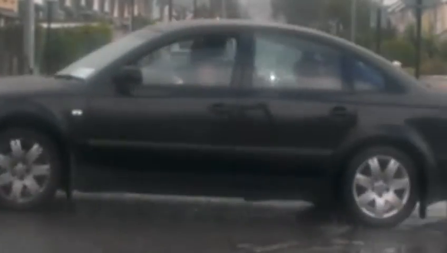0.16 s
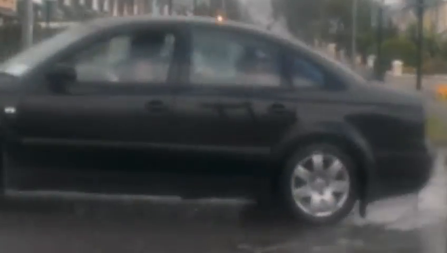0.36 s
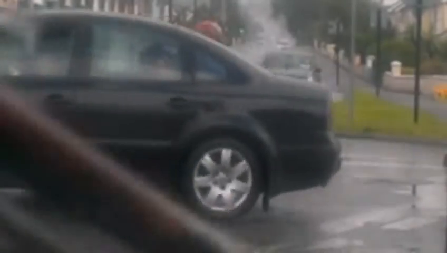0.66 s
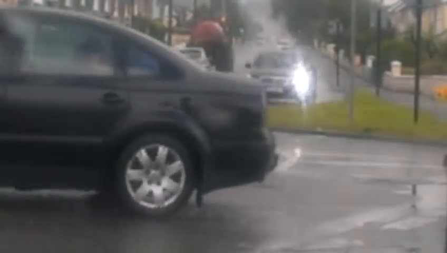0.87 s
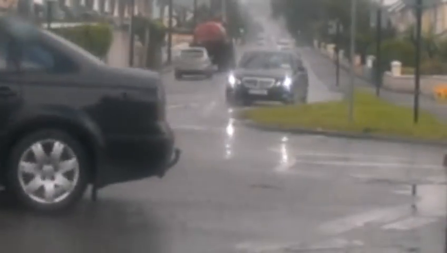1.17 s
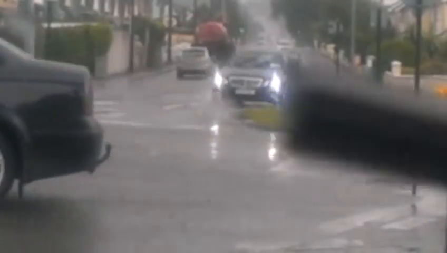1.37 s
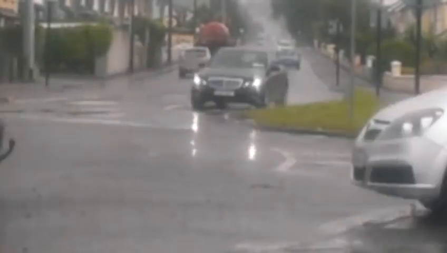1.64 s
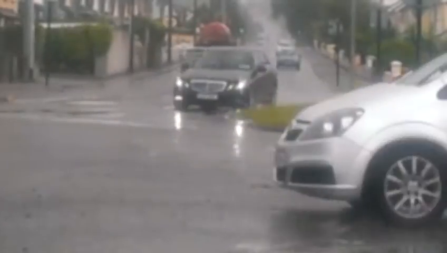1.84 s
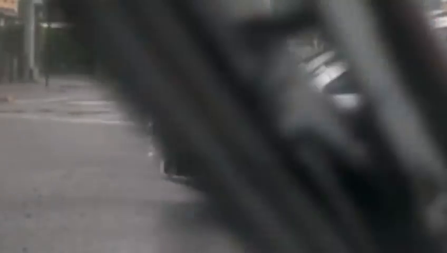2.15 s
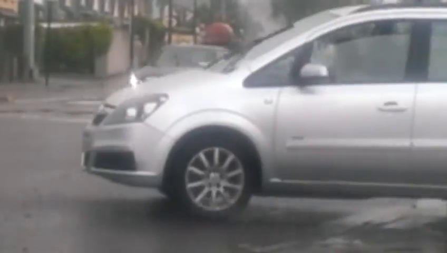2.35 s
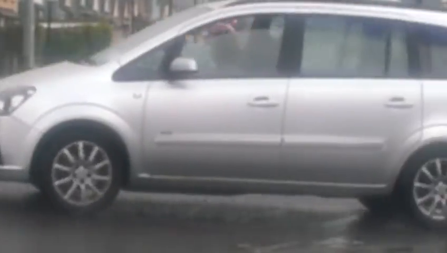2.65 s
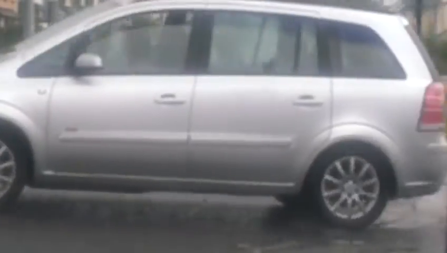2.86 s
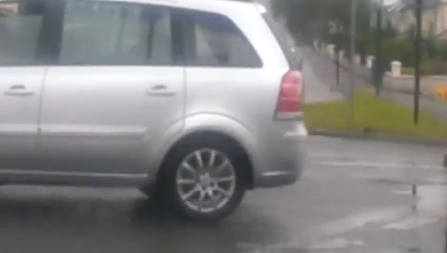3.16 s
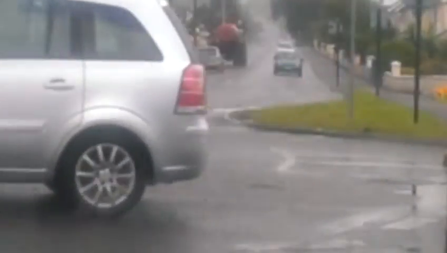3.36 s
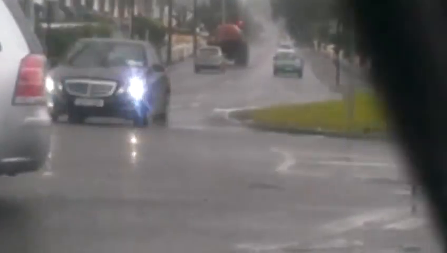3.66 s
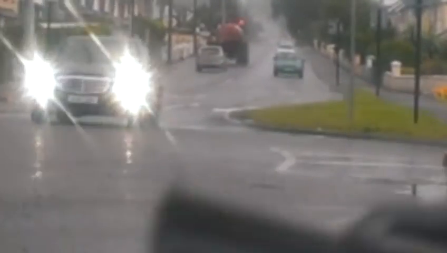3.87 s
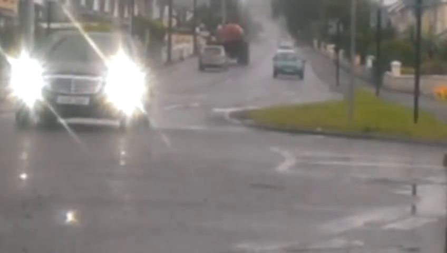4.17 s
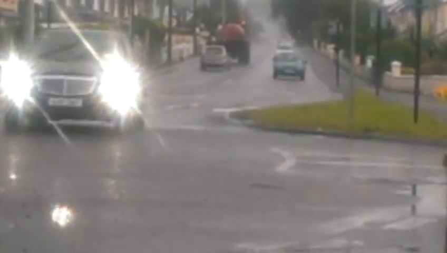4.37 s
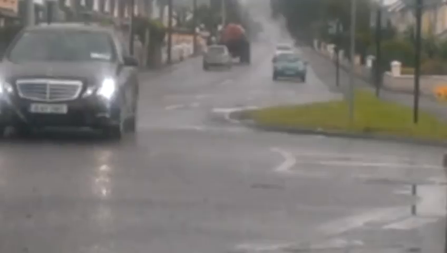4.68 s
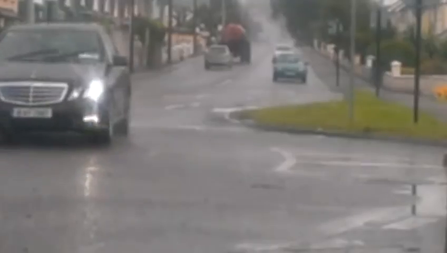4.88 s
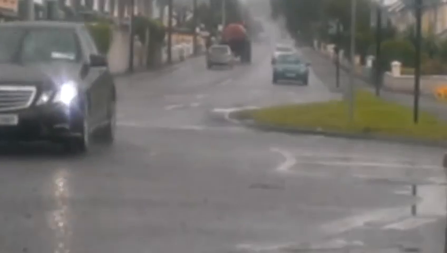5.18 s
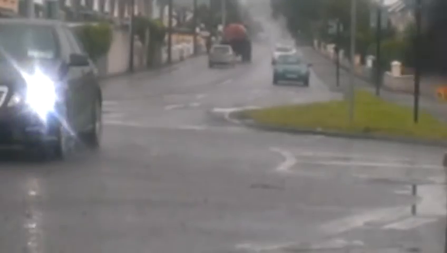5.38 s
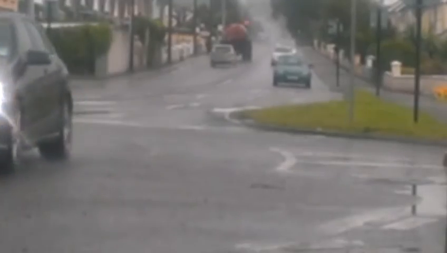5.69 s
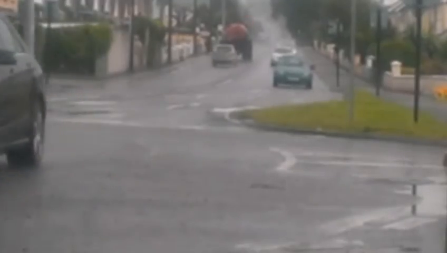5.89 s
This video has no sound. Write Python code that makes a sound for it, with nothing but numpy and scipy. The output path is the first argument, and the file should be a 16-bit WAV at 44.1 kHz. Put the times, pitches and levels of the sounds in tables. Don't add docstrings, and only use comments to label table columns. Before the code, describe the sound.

A quiet, close car interior in rain, with a light hiss of wet tyres outside, strongest at first and fading gradually. From 0 s a soft wiper motor whine climbs in pitch while rubber rubs and faintly groans on wet glass. At 0.5 s a hard, bright snap close to the microphone, with tiny rattling bounces, coincides with the blades knocking over at the top. They descend and flip at about 1.3 s in a cluster of dull, hollow flaps, ringing knocks and a linkage tick. The pattern repeats: upper turns near 2.1, 3.6 and 5.2 s, with glass thumps and a low body shudder; lower turns near 2.9, 4.4 and 5.9 s, with two overlapping groups of flaps. Each turn lasts around a tenth or two of a second, followed by small settling knocks. Occasional faint drops tick overhead. It ends as another upward stroke begins just after 6 s.

```python
import sys
import numpy as np
from scipy import signal
from scipy.fft import rfft, irfft, next_fast_len
from scipy.io import wavfile
from scipy.ndimage import map_coordinates

SR = 44100
rng = np.random.default_rng(int(sys.argv[2]) if len(sys.argv) > 2 else 0)


def to_wav(sig):
    pcm = np.clip(np.atleast_2d(sig), -1, 1) * 32767
    pcm = np.round(pcm).astype(np.int16)
    wavfile.write(sys.argv[1], SR, pcm.T)


def magnitude_from_level(level_db):
    exponent = np.asarray(level_db, float) / 20
    return 10 ** exponent


N = 265904

# time_s, level_db
ROAD_LEVEL = [
    (0.0, -63.5),
    (0.37, -64),
    (0.9, -67.5),
    (1.26, -65),
    (1.6, -67.5),
    (2.5, -69),
    (3.21, -71),
    (3.81, -69.5),
    (4.82, -72.5),
    (6.03, -71.5),
]
# frequency_hz, level_db_per_hz
TYRE_SPECTRUM = [(650, -36), (1100, 1.5), (1850, -4), (2720, 1), (3600, -6.5), (5000, -18), (6500, -20),
                 (11000, -120)]
# frequency_hz, level_db_per_hz
RUMBLE_SPECTRUM = [(12, -58), (20, -4.5), (60, -13.5), (113, -3.5), (128, -24), (140, 3), (180, -50),
                   (310, -120)]
# start_s, peak_db
ROOF_DROPS = [
    (0.123, -54),
    (1.4046, -54),
    (2.6787, -56),
    (2.857, -52.5),
    (3.6368, -53),
    (3.961, -56),
    (5.243, -53.5),
]
# start_s, length_s, squeak_db, spray_db
WATER_SHEETS = [(0.13, 0.02, -74, -72), (0.615, 0.23, -77, -73.5), (1.1, 0.25, -84, -75),
                (1.405, 0.026, -78, -72), (1.598, 0.17, -83, -76), (2.678, 0.053, -79, -74.5),
                (2.761, 0.18, -81, -74.5), (3.0, 0.22, -76.5, -76), (3.528, .06, -87, -81),
                (3.957, 0.039, -87, -70.5), (5.24, 0.012, -82, -66.5), (5.703, 0.13, -76.5, -74)]
# frequency_hz, level_db_per_hz
PREAMP_SPECTRUM = [(2060, -46), (3500, -9.5), (4790, -7.5), (8240, -6.5), (8880, -6), (12600, -6),
                   (15800, -0.5)]
# frequency_hz, level_db
PILOT_TONE = [(15488, -83)]
# time_s, pitch_hz, level_db
GEAR_WHINE = [
    [(0, 440, -60), (.138, 447, -69), (.25, 466, -57.5), (.356, 490.4, -51), (.46, 499.5, -52)],
    [(.64, 451, -61), (.74, 454, -60.5), (.988, 469, -63.5), (1.086, 487, -52), (1.2, 502, -53.5)],
    [(1.43, 437, -61), (1.6, 435.6, -67.5), (1.72, 454, -62.5), (1.83, 470, -57), (1.938, 490, -53),
     (2.0, 495, -52)],
    [(2.16, 456.5, -56), (2.25, 454.6, -62), (2.562, 473, -58), (2.63, 475.5, -51.5), (2.702, 497, -49),
     (2.74, 496, -47.5)],
    [(2.96, 434, -63), (3.16, 438.3, -68), (3.26, 453, -63.5), (3.444, 489, -53.5), (3.54, 496, -48)],
    [(3.72, 458.3, -57), (3.89, 459, -61), (4.088, 472.4, -60), (4.21, 487, -51), (4.28, 495, -51)],
    [(4.49, 432, -69), (4.7, 435, -80), (4.804, 455, -61.5), (4.98, 491, -51), (5.07, 495, -48)],
    [(5.24, 458, -54), (5.4, 456, -63), (5.634, 478.6, -61.5), (5.71, 486, -49), (5.786, 498.5, -50.5),
     (5.83, 497, -54)],
    [(6.0, 430, -63)],
]
# start_s, end_s, friction_db
STROKES = [
    (0.05, 0.459, -57.5),
    (0.626, 1.245, -59),
    (1.499, 2.019, -57.5),
    (2.199, 2.791, -59),
    (3.045, 3.551, -60),
    (3.752, 4.312, -59),
    (4.605, 5.08, -62.5),
    (5.298, 5.855, -60),
    (6.02, 6.5, -51),
]
# time_s, body_shake_db, drag_db, frame_buzz_db, lip_song_afterwards_db
REVERSALS = [
    (-0.2, -78, -55, -55, -58),
    (0.531, -55.5, -42.5, -48.5, -68),
    (1.33, -76, -45.5, -45.5, -70),
    (2.069, -57.5, -42.5, -53.5, -69),
    (2.86, -65, -52.5, -46, -63.5),
    (3.632, -57.5, -42.5, -49, -87),
    (4.4, -61.5, -52, -46.5, -66),
    (5.181, -52.5, -43.5, -52, -81),
    (5.94, -58, -46, -46.5, -60),
]
# start_s, length_s, level_db, pitch_hz
GLASS_GROANS = [
    (0.022, 0.26, -58.5, 332.3),
    (0.831, 0.087, -56, 191.6),
    (1.494, 0.21, -56, 334.3),
    (2.313, 0.11, -62.5, 229.5),
    (3.06, 0.091, -61.5, 336.5),
    (3.838, 0.11, -64.5, 218.6),
    (5.215, 0.028, -37, 199.7),
    (5.419, 0.076, -55.5, 211.5),
]
# frequency_hz, width_hz, level_db
GLASS_MODES = [(144.2, 12.6, -4), (195, 41.6, -3), (238.6, 52.3, -4), (324, 87.3, -6), (419, 138, -10)]
# frequency_hz, width_hz, level_db
FRAME_MODES = [(516, 81, 2.5), (672, 6.6, 7.5), (746, 46, 1), (865, 29, -14.5), (885, 23, -14),
               (1003, 43, -5.5)]
# frequency_hz, width_hz, level_db
STRUCK_MODES = [(650, 110, -2.5), (953, 116, 5), (1133, 420, -2), (1570, 860, -12.5)]
# frequency_hz, level_db_per_hz
SCRUB_SPECTRUM = [(600, 18.5), (1200, -6), (2500, -8.5), (5000, -25.5), (9000, -21), (16000, -33)]
# start_s, peak_db, pitch_hz
ARM_SETTLING = [(0.626, -49, 930), (0.649, -49, 696), (0.69, -47.5, 790), (0.719, -47, 757),
                (1.216, -45, 570), (2.017, -39, 670), (2.174, -43, 560), (2.194, -50, 779),
                (2.232, -45, 950), (2.27, -50, 710), (2.701, -45, 520), (3.777, -44.5, 964),
                (3.799, -54, 954), (4.186, -50, 420), (4.29, -45, 560), (4.627, -48, 395),
                (5.315, -52, 990), (5.62, -55, 985), (5.658, -48, 570)]
# start_s, snap_db, case_ring_db
NEAR_CLICKS = [
    (0.5043, -24, -25.5),
    (0.512, -31.5, -33),
    (0.52, -55, -47),
    (0.5265, -56, -43),
    (0.5323, -58, -56),
    (0.5448, -56, -50),
    (0.5396, -44, -34.5),
    (0.551, -52, -50),
]
# start_s,
# peak_db, pitch_hz
FRAME_KNOCKS = [(0.4825, -41, 870), (0.4912, -36, 800), (0.5019, -44, 844), (0.5087, -37, 886),
                (0.52, -37.5, 857), (0.5279, -34, 870), (1.2197, -47, 955), (1.2458, -40, 960),
                (1.2582, -39.5, 953), (1.2662, -39, 946), (1.2756, -45, 865), (1.3245, -42, 794),
                (1.3353, -39, 830), (1.3433, -45, 890), (1.3514, -33, 970), (2.0269, -44, 724),
                (2.0348, -43, 838), (2.045, -32.5, 890), (2.0583, -44, 816), (2.0696, -42.5, 950),
                (2.0763, -44, 820), (2.7809, -37.5, 950), (2.7909, -42, 965), (2.805, -34, 893),
                (2.8143, -41, 830), (2.8244, -38, 844), (2.8354, -40, 790), (2.8606, -39, 864),
                (2.8731, -34, 1085), (2.8867, -35.5, 910), (2.9055, -41, 900), (3.5626, -41, 810),
                (3.5802, -33, 920), (3.588, -33, 935), (3.6016, -37, 950), (3.615, -42, 955),
                (3.632, -47, 946), (3.6394, -45, 915), (4.293, -43.5, 950), (4.3145, -39, 936),
                (4.3312, -38.5, 880), (4.3478, -56, 849), (4.4053, -42, 950), (4.4145, -45, 860),
                (4.4275, -37, 960), (4.4438, -45, 844), (5.1043, -42, 840), (5.1222, -32, 905),
                (5.1436, -36, 952), (5.1579, -41, 840), (5.171, -39, 880), (5.18, -44, 940),
                (5.19, -46, 826), (5.8596, -43, 960), (5.8762, -45, 925), (5.893, -38, 865),
                (5.9372, -37, 980), (5.9449, -50, 850), (5.965, -42, 922),
                (2.02, -57, 1550), (2.044, -59, 1600), (2.06, -51, 1340), (2.068, -52, 1260),
               (2.094, -55, 1550), (3.582, -50, 1390), (3.593, -53, 1810), (3.648, -49, 1260),
               (5.122, -51, 1422), (5.186, -46, 1290), (5.937, -40, 1370), (5.949, -47, 1320)]
# start_s, peak_db
ARM_PINGS = [(0.4868, -35), (0.5282, -32.5), (0.5537, -42.5), (1.2573, -19.5), (1.2795, -24), (1.3226, -27),
             (1.3514, -24.5), (2.0422, -28.5), (2.051, -29), (2.082, -46), (2.7542, -34), (2.7815, -29.5),
             (2.8025, -20), (2.8149, -33), (2.8264, -32), (2.8651, -22.5), (2.883, -33), (3.5529, -50),
             (3.5651, -37), (3.5817, -27.5), (3.5917, -48), (3.6309, -30), (3.6455, -33.5), (4.2872, -36),
             (4.2993, -33), (4.3134, -24.5), (4.3256, -21.5), (4.3382, -34), (4.3504, -27), (4.3956, -25),
             (4.4107, -41), (4.4217, -30.5), (4.4351, -40), (5.0859, -38), (5.1044, -30.5), (5.1183, -33),
             (5.1353, -35), (5.1718, -29), (5.8712, -22), (5.8941, -28), (5.9171, -32), (5.9388, -30),
             (5.9646, -25.5)]
# start_s, peak_db, upper_ring_db, crack_db
LINKAGE_TICKS = [(1.3245, -49, 0, -25), (1.3393, -36.5, -7, -3), (2.059, -57, 0, -17),
                 (2.8523, -51, -3, -28), (2.867, -41.5, -9, 3), (2.8769, -36, -13, -12),
                 (3.6367, -36.5, 3, -15), (4.398, -44, -25, -33), (4.409, -34.5, -9, 3),
                 (5.1764, -37, 0, -30), (5.9402, -39, -1, 8)]
# frequency_hz, width_hz, level_db
LINKAGE_MODES = [(1150, 270, 5), (1654, 71, 5.5), (1850, 200, 2)]
# frequency_hz, width_hz, level_db
LINKAGE_UPPER_MODES = [(2330, 140, -4.5), (2690, 280, -0.5), (2870, 1100, -28)]
# start_s, lip_db, lip_hz, length_s
LEADING_FLAPS = [(1.215, -31.5, 348, 0.02), (1.2455, -17.5, 371, 0.011), (1.258, -16, 366, 0.018),
                 (1.276, -28.5, 450, 0.016), (1.297, -28, 420, 0.0082), (2.754, -29, 370, 0.017),
                 (2.7633, -33, 377, 0.015), (2.7826, -15, 353.5, 0.016), (2.804, -15.5, 391, 0.016),
                 (2.821, -29.5, 499, 0.016), (2.838, -40, 480, 0.016), (4.2904, -29, 400, 0.02),
                 (4.3137, -19, 356, 0.021), (4.3287, -17, 400, 0.015), (4.346, -26, 506, 0.013),
                 (5.82, -37, 436, 0.014), (5.838, -31, 327.5, 0.0082), (5.86, -18, 362, 0.012),
                 (5.8733, -16, 366, 0.017), (5.897, -18, 450, 0.0065), (5.908, -33, 415, 0.011)]
# start_s, lip_db, lip_hz, length_s, glass_thump_db
TRAILING_FLAPS = [(1.315, -35, 417, 0.023, -52), (1.329, -20.5, 341, 0.018, -43),
                  (1.348, -21.5, 378, 0.017, -26), (1.3624, -23.5, 320, 0.019, -28),
                  (2.848, -39, 400, 0.017, -33.5), (2.863, -15, 378, 0.0052, -44),
                  (2.874, -14, 438, 0.0051, -41), (2.887, -17, 338, 0.018, -51),
                  (2.904, -28, 360, 0.015, -33.5), (4.39, -31, 406, 0.0087, -27),
                  (4.4, -21, 332, 0.016, -22.5), (4.424, -21, 368, 0.0189, -24),
                  (4.442, -35, 380, 0.016, -29), (5.924, -21, 399, 0.015, -40),
                  (5.9385, -15, 307, 0.0095, -47), (5.952, -29.5, 373, 0.01, -32),
                  (5.9649, -19.5, 357, 0.018, -27), (5.984, -29.5, 363, 0.014, -32)]
# start_s, lip_db, glass_thump_db, length_s
TOP_FLAPS = [(0.4772, -44, -29.5, 0.081), (0.499, -35, -22, 0.009), (0.5163, -27.5, -46, 0.01),
             (0.528, -27.5, -48, 0.016), (0.5484, -39, -27, 0.0079), (0.554, -32.5, -50, 0.018),
             (2.02, -44, -30, 0.019), (2.03, -29, -29, 0.026), (2.05, -36.5, -55, 0.031),
             (2.0756, -28, -26, 0.0067), (2.087, -29, -47, 0.016), (2.108, -44, -26.5, 0.011),
             (2.171, -43, -38.5, 0.019), (3.552, -31.5, -36, 0.019), (3.569, -34, -29, 0.0083),
             (3.5818, -28, -17.5, 0.011), (3.6008, -25.5, -31, 0.024), (3.62, -47, -51, 0.0078),
             (3.638, -18.5, -52, 0.0071), (3.6442, -14.5, -40, 0.0033), (3.65, -29, -18.5, 0.012),
             (3.662, -40, -23.5, 0.021), (3.689, -39, -30, 0.012), (5.088, -37.5, -32.5, 0.016),
             (5.1067, -29.5, -61, 0.011), (5.1195, -32, -19.5, 0.023), (5.142, -29, -33, 0.0066),
             (5.153, -25.5, -27, 0.014), (5.176, -19, -45, 0.0047), (5.1825, -25, -19.5, 0.016),
             (5.203, -33, -22.5, 0.016)]
TOP_FLAP_PITCHES = [403, 373, 383, 371, 420, 381, 410, 380.7, 465, 419, 351, 420, 383, 458, 412, 431, 323,
                    367, 412, 397, 419, 409, 422, 403, 391.5, 444, 393, 338, 400, 344, 379]

ARM_HZ, ARM_UPPER_HZ = 553.7, 672
TURN_S = np.transpose(REVERSALS)[0]


def unit(x):
    return x / np.sqrt(np.mean(x ** 2) + 1e-20)


def curves(rows):
    s, *columns = np.transpose(rows)
    return [np.interp(np.arange(N) / SR, s, column) for column in columns]


def wobble(rate):
    knots = rng.standard_normal(int(N * rate / SR) + 4)
    return map_coordinates(knots, [np.arange(N) * rate / SR])


def swells(s, peak_db, rest_db, rise, fall, hold=0):
    t = np.arange(0, N / SR + .002, .002)
    late = t - s[:, None]
    before = np.clip(late, None, 0)
    after = np.clip(late - np.reshape(hold, (-1, 1)), 0, None)
    shape = np.exp(-(before / rise) ** 2 - after / fall)
    strongest = shape == shape.max(axis=0)
    level_db = rest_db + np.sum((peak_db - rest_db)[:, None] * shape * strongest, axis=0)
    return curves(np.transpose([t, level_db]))[0]


def filtered(x, response):
    m = next_fast_len(N + SR // 2)
    return irfft(rfft(x, m) * response(np.fft.rfftfreq(m, 1 / SR)), m)[:N]


def modes(table):
    def response(f):
        total = 0
        for k, (centre, width, db) in enumerate(table):
            damping = 1j * f * width
            total = total + (-1) ** k * magnitude_from_level(db) * damping / (centre * centre - f * f + damping)
        return total
    return response


def slope(points):
    f, db = np.transpose(points)
    return lambda hz: magnitude_from_level(np.interp(np.log(hz + 1), np.log(f + 1), db, left=-120, right=-120))


def noise(response):
    return unit(filtered(rng.standard_normal(N), response))


def impulses(times, db):
    strength = magnitude_from_level(db) * rng.choice([-1, 1], len(times))
    return np.bincount(np.round(times * SR).astype(int), strength, N)


def traffic():
    level_db = curves(ROAD_LEVEL)[0] - 1.5 + 0.18 * wobble(7.2)
    return magnitude_from_level(level_db) * noise(slope(TYRE_SPECTRUM))


def body_rumble():
    shake_db = np.transpose(REVERSALS)[1]
    level_db = swells(TURN_S - .03, shake_db, -86.0, rise=0.05, fall=0.21, hold=0.028)
    return magnitude_from_level(level_db + 7.0 + 0.37 * wobble(24.0)) * noise(slope(RUMBLE_SPECTRUM))


def water():
    s, length, squeak_db, spray_db = np.transpose(WATER_SHEETS)
    film_db = swells(s, squeak_db, -84.5, rise=.03, fall=0.12, hold=length) + 2.0 * wobble(53)
    film = magnitude_from_level(film_db) * noise(modes([(8970, 480, 1)]))
    thrown_db, thrown_s = np.resize([(-68.5, 0.076), (-68, 0.075)], (len(REVERSALS), 2)).T
    thrown_start = TURN_S - thrown_s / 2 + 0.017
    thrown_db = swells(thrown_start, thrown_db, -94, rise=0.018, fall=0.023, hold=thrown_s)
    pushed_db = swells(s, spray_db, -85.5, rise=0.0097, fall=0.045, hold=length)
    splash = modes([(11000, 12000, 0)])
    return film + magnitude_from_level(np.maximum(thrown_db, pushed_db)) * noise(lambda f: splash(f) ** 2)


def drops():
    s, db = np.transpose(ROOF_DROPS)
    return filtered(impulses(s, db + 21.0), modes([(9000, 820, 6.5), (13150, 5000, -6)]))


def motor():
    hz, db = curves(np.concatenate(GEAR_WHINE))
    db = db + swells(TURN_S, np.full(len(TURN_S), -1.5), 0, rise=0.035, fall=0.15, hold=0.07)
    phase = 2 * np.pi * np.cumsum(hz + 2.2 * wobble(30)) / SR
    arm_mode, grit_mode = modes([(ARM_HZ, 40, 0)]), modes([(480, 90, 0)])
    arm = magnitude_from_level(db - 11 + 3 * wobble(12)) * noise(lambda f: arm_mode(f) ** 2)
    grit = magnitude_from_level(db - 20) * noise(lambda f: grit_mode(f) ** 2)
    gear = np.sqrt(2) * np.sin(phase) * magnitude_from_level(db + 2 * wobble(60) + 2 * wobble(20))
    return arm + grit + gear


def rubbing():
    start, end, friction_db = np.transpose(STROKES)
    _, _, drag_db, buzz_db, song_db = np.transpose(REVERSALS)
    stroke_db, = curves(np.transpose([(start + end) / 2, friction_db]))
    drag_db = np.maximum(stroke_db, swells(TURN_S, drag_db, -61.5, rise=0.093, fall=0.16))
    buzz_db = np.maximum(stroke_db - 0.9, swells(TURN_S - 0.013, buzz_db, -69, rise=0.14, fall=0.17))
    song_db = swells(TURN_S + 0.096, song_db, -82.5, rise=0.29, fall=0.3, hold=0.091)
    unsteady = magnitude_from_level(1.1 * wobble(45))
    glass, frame_ring, broad = modes(GLASS_MODES), modes(FRAME_MODES), modes([(780, 700, 0)])
    lip = modes([(338, 16, 0), (372, 18, -5)])
    rubbed_glass = noise(lambda f: glass(f) * (1j * f / (1j * f + 100)) ** 2)
    drag = magnitude_from_level(drag_db + 1.0) * unit(unsteady * magnitude_from_level(1.0 * wobble(16.0)) * rubbed_glass)
    rubbed_frame = noise(lambda f: frame_ring(f) * broad(f))
    buzz = magnitude_from_level(buzz_db - 4.5) * unit(unsteady ** .5 * magnitude_from_level(0.24 * wobble(31)) * rubbed_frame)
    song = magnitude_from_level(song_db + 4.5 + 1.8 * wobble(8.6)) * noise(lambda f: lip(f) ** 2)
    return song + drag + buzz


def groans():
    s, length, db, hz = np.transpose(GLASS_GROANS)
    ends = np.ravel([s - .03, s + length + 0.1004], "F")
    hz, = curves(np.transpose([ends, np.repeat(hz, repeats=2)]))
    phase = 2 * np.pi * np.cumsum(hz + 10 * wobble(40)) / SR
    level_db = swells(s, db, -81, rise=0.023, fall=0.1, hold=length) + 2.8 * wobble(40)
    return np.sqrt(2) * np.sin(phase) * magnitude_from_level(level_db)


def settling():
    out, t = np.zeros(N + SR), np.arange(SR // 10) / SR
    for s, db, hz in ARM_SETTLING:
        envelope = magnitude_from_level(db - 60 * t / 0.053) * (1 - np.exp(-t / 0.0011))
        out[round(s * SR):][:len(t)] += envelope * np.sin(2 * np.pi * hz * t)
    return out[:N]


def clicks():
    s, snap_db, case_db = np.transpose(NEAR_CLICKS)
    snap, case = modes([(8100, 6700, 0.0077)]), modes([(2720, 550, 0)])

    def snap_with_echo(f):
        echo = 1 + 0.33 * np.exp(-2j * np.pi * f * 0.000904)
        return snap(f) ** 3 / (1 + (f / 10200) ** 6) * echo

    out = filtered(impulses(s + 0.00043, snap_db + 26), snap_with_echo)
    out += filtered(impulses(s + .0007, case_db + 34), lambda f: case(f) ** 2)
    out += filtered(impulses(s + 0.00097, case_db + 30.0), modes([(1550, 156, 1.5), (4340, 160, -4.5)]))
    decay = magnitude_from_level(-60 * np.arange(SR // 10) / SR / 0.11)
    shake = signal.fftconvolve(abs(impulses(s, case_db)), decay)[:N]
    rattle = noise(modes([(1720, 200, -18), (2580, 410, 46.0), (7300, 4500, -37.0)]))
    return out + magnitude_from_level(-15.5) * abs(shake) * rattle


def frame():
    out, t = np.zeros(N + SR), np.arange(SR // 20) / SR
    knock_rise, ping_rise = 0.0038, 0.0061
    rows = [(*row, knock_rise) for row in FRAME_KNOCKS]
    for s, db in ARM_PINGS:
        at_top = abs(s - TURN_S).argmin() % 2
        rows.append((s, db - 6.5, ARM_HZ, ping_rise))
        rows.append((s, db + (-26.5, -11)[at_top], ARM_UPPER_HZ, ping_rise))
    for (s, db, hz, rise), (phase, detune) in zip(rows, rng.standard_normal((len(rows), 2))):
        swell = (t / rise * np.exp(1 - t / rise)) ** 1.8
        ring = np.sin(2 * np.pi * hz * (1 + 0.028 * detune) * t + 2 * phase)
        out[round(s * SR):][:len(t)] += magnitude_from_level(db) * swell * ring
    return out[:N]


def linkage():
    s, db, upper_db, crack_db = np.transpose(LINKAGE_TICKS)
    t = np.arange(SR // 20) / SR
    rattle = magnitude_from_level(-60 * t / 0.0047) + 0.31 * magnitude_from_level(-60 * t / 0.068)
    rattle = rattle * (1 - np.exp(-t / 0.003)) * 0.25
    lead = round(.03 * SR)
    scrape = 0.057 * magnitude_from_level(-60 * t[lead:0:-1] / 0.029)
    rattle = np.concatenate([scrape, rattle + 0.0263 * (t < .002)])

    def blow(level_db, lag=0):
        envelope = signal.fftconvolve(impulses(s + lag - .001 - lead / SR, level_db), rattle)[:N]
        return 0.51 * envelope * rng.standard_normal(N) + impulses(s + lag, level_db - 4.0)

    low = filtered(blow(db + 34.0), modes(LINKAGE_MODES))
    upper = filtered(blow(db + upper_db + 39.0), modes(LINKAGE_UPPER_MODES))
    bright = modes([(4600, 3500, 0)])
    crack = filtered(blow(db + crack_db + 9.5, lag=0.0016), lambda f: bright(f) ** 2)
    return filtered(low + upper, lambda f: 1 / (1 + 1j * f / 3500) ** 2) + crack


def flaps():
    lead = [(s, db, hz, length, db - 11.5, 0.48 * db - 34.5, -9.5) for s, db, hz, length in LEADING_FLAPS]
    trail = [(*row, row[1] - 20, -1) for row in TRAILING_FLAPS]
    s, lip_db, thump_db, length = np.transpose(TOP_FLAPS)
    to_turn = s[:, None] - TURN_S
    since = to_turn[np.arange(len(s)), abs(to_turn).argmin(axis=1)] + 0.057
    knock_db = np.maximum(lip_db, thump_db) - 17 - 150 * np.clip(since, 0, None)
    top = zip(s, lip_db, TOP_FLAP_PITCHES, length, thump_db, knock_db, np.zeros(len(s)))
    return lead + trail + list(top)


def blades():
    out, force, t = np.zeros(N + SR), np.zeros(N + SR), np.arange(SR // 10) / SR
    struck = modes(STRUCK_MODES)
    shaken = np.tile(noise(lambda f: struck(f) ** 2), 2)

    def hold(length, rise, fall):
        release = np.exp(-(np.clip(t - length, 0, None) / fall) ** 2)
        return (1 - np.exp(-(t / rise) ** 2)) * magnitude_from_level(-4 * t / length) * release

    rows = flaps()
    for row, (a, b, c) in zip(rows, rng.standard_normal((len(rows), 3))):
        s, lip_db, hz, length, thump_db, knock_db, scrub_db = row
        turn = 2 * np.pi * t
        lip = np.sin(hz * turn)
        lip += 0.16 * np.sin(1.468 * hz * turn + a)
        lip += 0.32 * np.sin(0.742 * hz * turn + b)
        thump = magnitude_from_level(thump_db) * np.sin(205 * (1 + 0.073 * np.tanh(b)) * turn + a)
        knock = magnitude_from_level(knock_db - 6.5 + 0.5 * c) * shaken[round(s * SR):][:len(t)]
        flap = hold(length, 0.0031, 0.0014) * magnitude_from_level(lip_db) * lip
        flap += hold(length, 0.0014, 0.0091) * thump
        flap += hold(length, 0.0038, 0.0095) * knock
        start = round((s - .0015) * SR)
        out[start:][:len(t)] += flap
        force[start:][:len(t)] += magnitude_from_level(0.49 * knock_db + scrub_db) * hold(length, 0.0073, 0.016)
    scrub = magnitude_from_level(-26.0) * force[:N] * noise(slope(SCRUB_SPECTRUM))
    ring = magnitude_from_level(-12.0) * filtered(out[:N], modes(GLASS_MODES))
    return filtered(out[:N] + ring, lambda f: (1j * f / (1j * f + 110)) ** 3) + scrub


def scene():
    outside = traffic() + body_rumble() + water() + drops()
    stroke = motor() + rubbing() + groans() + settling()
    return (outside + stroke + clicks() + frame() + linkage() + blades())[None]


def low_pass(x):
    return signal.sosfilt(signal.butter(12, 16400, fs=SR, output="sos"), x)


def record(dry):
    cut = filtered(dry[0], lambda f: (1j * f / (1j * f + 60)) ** 2)
    (hz, db), = PILOT_TONE
    pilot = np.sqrt(2) * magnitude_from_level(db) * np.sin(2 * np.pi * hz * np.arange(N) / SR)
    hiss = magnitude_from_level(-74.0) * noise(slope(PREAMP_SPECTRUM))
    mix = filtered(cut + hiss + pilot, lambda f: f < 15740)
    return low_pass(mix[None])


dry = scene()
out = record(dry)
to_wav(out)
```